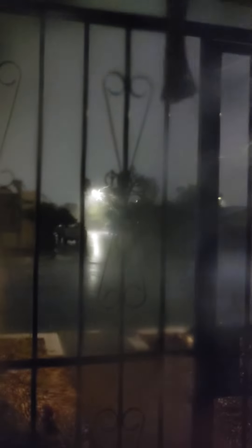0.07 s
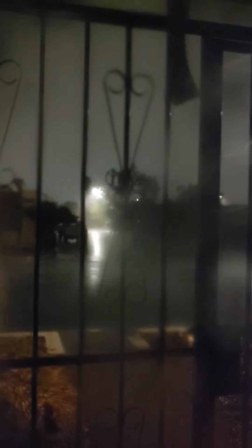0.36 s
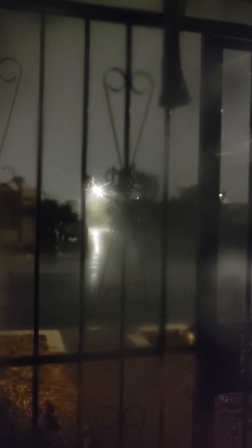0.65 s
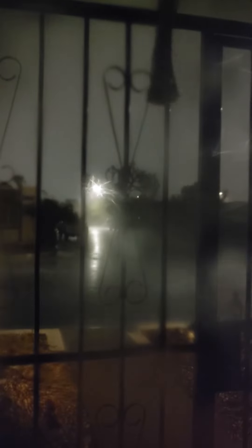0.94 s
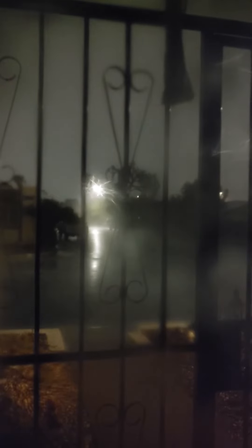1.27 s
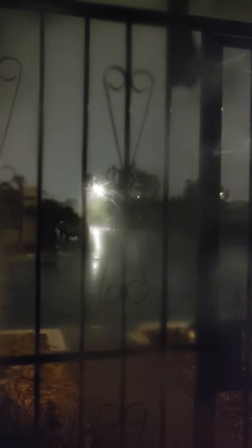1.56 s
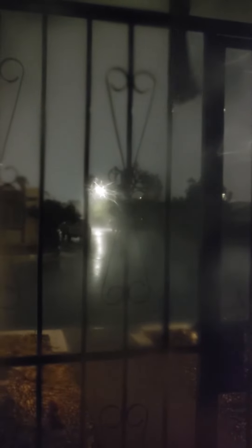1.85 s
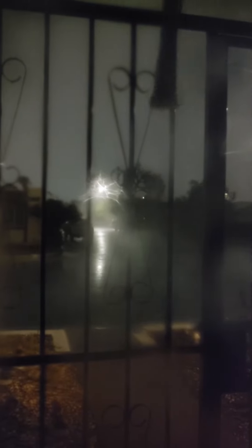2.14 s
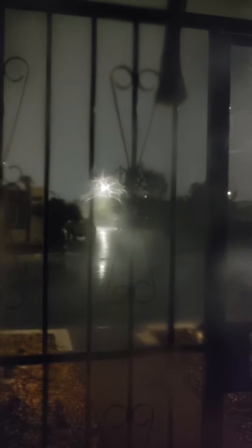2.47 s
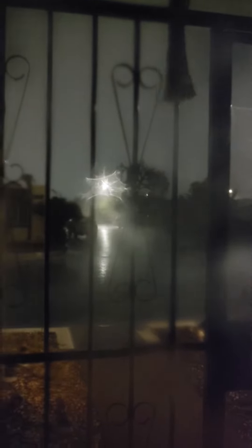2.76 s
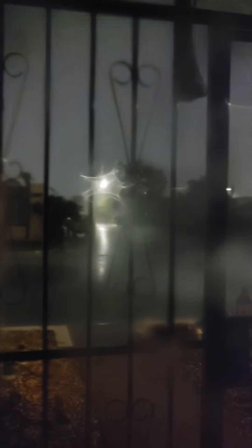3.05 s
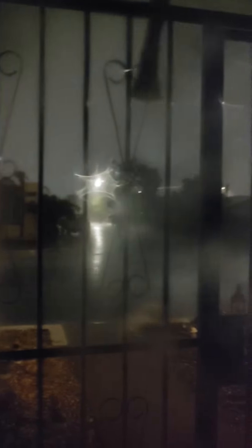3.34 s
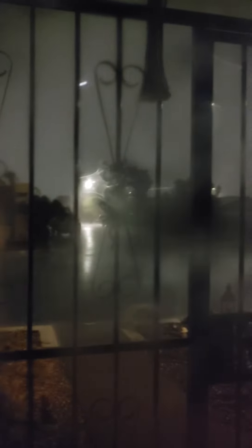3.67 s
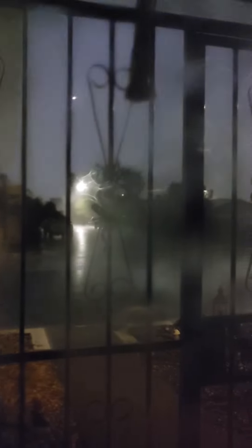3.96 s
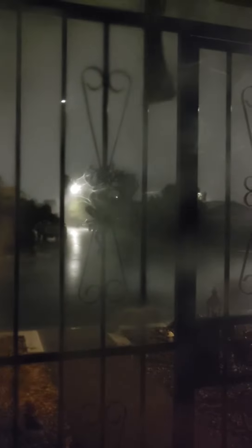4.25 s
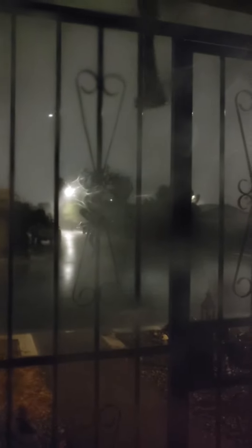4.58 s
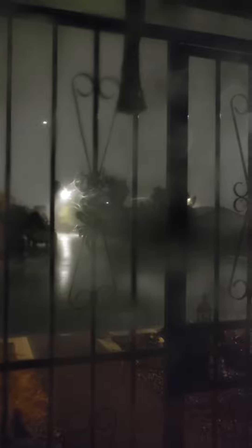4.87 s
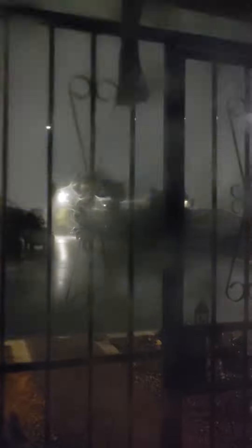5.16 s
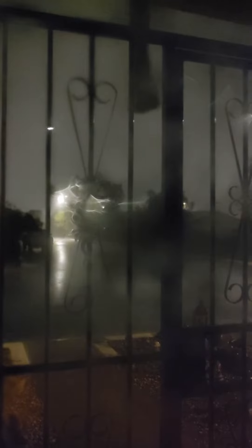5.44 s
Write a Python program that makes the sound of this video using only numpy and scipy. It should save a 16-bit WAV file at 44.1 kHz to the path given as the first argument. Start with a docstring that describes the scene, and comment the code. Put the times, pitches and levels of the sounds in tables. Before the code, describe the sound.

A steady downpour booms on the roof and hisses on the street, with close drips from the eaves and a faint hum.

```python
"""Heavy night rain, heard from just inside a barred window.
From the start the downpour drums on the roof and, with the wind, booms in the room, over street hiss
and a thin whine. Drops from the eaves splat, click and plop close by, mostly to the right; the walls
answer, and a gutter rings now and then. Just after 1 s a mains hum swells and a soft thud passes.
Near 2.7 s one drop gulps and the rain peaks; after 4 s hum and gutter swell again in easing rain."""
import sys
import numpy as np
from scipy import signal
from scipy.fft import rfft, irfft, next_fast_len
from scipy.io import wavfile
from scipy.ndimage import uniform_filter1d, map_coordinates

SR = 44100
rng = np.random.default_rng(int(sys.argv[2]) if len(sys.argv) > 2 else 0)


def transcribe(u):
    """Save the signal u as a 16-bit wav file named by the first command-line argument.

    u: samples, shape (n,) or (channels, n), limited to [-1, 1]; the rate is SR.
    q: integer samples, one column per channel.
    """
    v = np.clip(np.atleast_2d(u).T, -1, 1)
    q = np.round(v * 32767).astype(np.int16)
    wavfile.write(sys.argv[1], SR, q)


N = 247401

# Resonances of roof, roof panels, room, gutter and whine: centre_hz, half_width_hz, gain_db
ROOF_MODES = [(274, 20, -7.5), (285.2, 16.2, -1), (332, 15.4, -1.5), (363.8, 13, -4), (438, 22, -8.5)]
PANEL_MODES = [(519, 52, -6), (581.5, 15.5, -1), (614, 7.8, -0.5), (656, 32, -6.5), (717, 7.9, -10.5),
               (796, 43, -13.5), (1028, 31, -16)]
ROOM_MODES = [(80.6, 3.5, -10.5), (99.3, 10.7, -5), (125, 5.8, 3.5), (134.4, 7.8, -2.5), (146.1, 0.87, 5.5),
              (167, 13, 4), (181.4, 11.6, 1)]
GUTTER_MODES = [(740.4, 16, 16), (810, 56, -16), (1030, 11, -25)]
WHINE_MODES = [(1910, 48, 0), (1780, 100, -4.5)]
# Spectral shapes of the continuous noises: frequency_hz, density_db
ROOF_SPECTRUM = [(110, -28.5), (200, -1), (265, -3.5), (370, -2.5), (490, -12.5), (640, -17.5),
                 (790, -32.5), (890, -26.5), (1100, -37), (1400, -45), (2500, -68)]
WIND_SPECTRUM = [(15, -36), (25, -29), (40, -1), (70, 51), (150, 17), (300, -33), (600, -58)]
STREET_SPECTRUM = [(400, -15), (900, 8), (1250, 5.5), (1600, 6), (1900, 5), (2130, 3), (3300, -1.5),
                   (4700, -6.5), (5800, -1.5), (6700, -10.5), (7700, -14), (11000, -14), (13000, -17),
                   (15700, -17)]
# Spectral shapes of the four parts of a splat: frequency_hz, density_db
TICK_SPECTRUM = [(2000, -70), (3800, -34), (4800, -8), (5700, 7.5), (6600, -2), (7300, -11.5), (9500, -67)]
KNOCK_SPECTRUM = [(600, -80), (1100, -31), (1600, 3.5), (2200, 4), (3000, 0), (4500, -27), (7000, -100)]
TAP_SPECTRUM = [(1200, -90), (2400, -13), (3200, -6.5), (4200, 1.5), (4900, -2.5), (6000, -5), (8000, -67)]
SPRAY_SPECTRUM = [(2000, -80), (5000, -2), (7000, 9.5), (9000, 5), (10500, -1.5), (15500, -11)]
# Strength of the rain all around, and of the sheets blown onto the roof: time_s, gain_db
RAIN_STRENGTH = [(0, -1.5), (1.05, -1), (1.7, 0.4), (2.25, 0.8), (2.75, 2), (3.5, -1), (4.5, -1.1),
                 (5.2, -1), (5.61, -0.5)]
ROOF_SHEETS = [(0, -3.5), (.38, -1.5), (.6, 1.5), (.8, 1), (.93, 4.5), (1.15, -0.5), (1.55, 3), (1.9, 0.5),
               (2.4, 2.5), (2.65, 1), (3.1, 4.5), (3.4, 2.5), (4.0, -0.7), (4.27, -5.5), (4.82, 3.5),
               (5.1, -0.5), (5.61, -3.5)]
# Envelopes of the roof panels, the wind-stirred room and the mains hum: time_s, level_db
PANEL_ENVELOPE = [(0, -51.5), (.8, -49.5), (.91, -46), (1.05, -50), (1.35, -52), (1.72, -45), (2.0, -48.5),
                  (2.3, -48), (2.55, -49), (2.86, -46), (3.1, -47), (3.5, -54), (3.97, -50), (4.1, -56.5),
                  (4.55, -58), (4.8, -59), (5.05, -49.5), (5.24, -48), (5.4, -53), (5.61, -51)]
GUST_ENVELOPE = [(0, -39.5), (.55, -37), (.85, -42.5), (1.22, -36.5), (1.4, -39.5), (1.8, -39.5),
                 (2, -40.5), (2.9, -38), (3.45, -35.5), (3.8, -41), (4.02, -41), (4.15, -39.5),
                 (4.38, -36.5), (4.53, -39), (4.8, -37), (5.3, -40.5), (5.5, -38), (5.61, -40.5)]
HUM_ENVELOPE = [(0, -51), (.95, -53.5), (1.1, -42), (1.25, -40), (1.45, -57), (2.4, -46), (2.7, -50),
                (3.9, -58), (4.17, -39.5), (4.32, -39), (4.42, -60), (5.61, -48)]
# Big drops from the eaves; pan is left minus right throughout:
# start_s, level_db, body_gain_db, spray_gain_db, pitch_hz, pan_db
EAVES_DROPS = [(0.134, -48, -13, -21, 5900, -2), (0.1798, -48, -8, -21, 5710, -6),
               (0.508, -43.5, -9.5, -30, 5500, -6), (0.524, -46.5, -14, -23, 5460, -7),
               (0.628, -56, -3, -30, 5610, -3), (0.697, -47.5, -29, -22, 6200, -2),
               (0.7743, -47.5, -10.5, -19, 5940, -7), (1.082, -41, -18.5, -12.5, 5900, -3),
               (1.13, -44.5, -23, -22, 5830, -7), (1.312, -47.5, 7, -40, 5100, -4.5),
               (1.415, -43, -13, -27, 5330, -4), (1.442, -42, -12, -35, 5230, -6),
               (1.486, -42.5, -2.5, -23, 5700, -2.5), (1.561, -41.5, -13, -40, 5800, -3),
               (1.635, -35.5, -12, -20, 6000, -4), (2.4822, -37, -13, -26, 5800, -4),
               (2.775, -43.5, -10, -32, 5850, -4), (2.951, -44.5, -21, -21.5, 5940, -6),
               (3.0018, -37.5, -21, -33, 6100, -1), (3.048, -43.5, -20, -22, 5470, -10),
               (3.197, -49, -8, -14, 5700, -3), (3.2225, -39.5, -3.5, -13, 5800, -2),
               (3.2857, -38, -13, -21.5, 5900, -4), (3.326, -47, -3.5, -16, 5700, -3),
               (3.409, -45.5, -20, -19, 5630, -3), (3.429, -47.5, -11.5, -24, 5550, -9),
               (3.6767, -46, -6, -17, 5560, -5), (3.714, -45.5, -23, -23, 5550, -5),
               (3.75, -49, -22, -19, 5660, -2), (4.097, -48.5, -8, -19, 5980, -4),
               (4.12, -41, -22, -29, 5980, -1), (4.161, -45, -19, -32, 5360, -9),
               (4.199, -41.5, -33, -32, 5540, -4), (4.304, -49.5, -10, -22, 5590, -6.5),
               (4.345, -43.5, -11, -13, 5700, -3), (4.702, -49, -7.5, -16, 6020, -5),
               (4.772, -57.5, 1.5, -11, 5700, -6), (4.861, -52.5, -12, -14, 6350, -3),
               (4.985, -50, -24, -18, 5600, -7), (5.2882, -46.5, -21, -35, 5630, -6),
               (5.3897, -48.5, -9, -21, 5630, -9), (5.454, -50, -0.5, -20, 5830, -9),
               (5.5154, -49, -15, -6.5, 5710, -3), (5.542, -40, -19, -26, 5660, -7)]
# Drops that strike something hard: start_s, level_db, pitch_hz, pan_db
CLICKS = [(0.182, -46, 4970, -9), (0.53, -43.5, 2200, 0), (1.0835, -40, 5760, -10),
          (1.3126, -36, 3900, -12), (1.4412, -39.5, 4400, -5.5), (1.4474, -41, 5100, -5.5),
          (1.4868, -41, 4400, -3.5), (1.495, -45, 3450, -5), (1.563, -41, 5500, 1),
          (1.6375, -33.5, 5760, -10), (2.6629, -36.5, 1550, -1), (3.0072, -35.5, 5900, -1.5),
          (3.2212, -42, 3200, -4.5), (3.2645, -36, 1990, 1), (3.288, -38.5, 5900, 0),
          (3.9327, -51, 3870, -7), (4.0975, -51, 4130, -11), (4.123, -38.5, 5970, -1.5),
          (4.162, -45, 5600, -6.5), (4.2107, -47, 5250, -1), (4.3473, -38, 5450, -8)]
# Drops that ring in standing water: start_s, level_db, pitch_hz, width_octaves, pan_db
PLOPS = [(0.512, -49.5, 2620, 0.14, -1), (0.514, -51, 1780, 0.11, 5), (0.776, -51, 2580, 0.2, -4),
         (1.317, -47.5, 2230, 0.24, 5), (1.49, -49, 2300, 0.27, 1), (2.665, -52, 1340, 0.59, -15),
         (2.672, -59, 1150, 0.25, -2), (2.684, -52, 1500, .26, -3), (3.2217, -47.5, 3740, 0.4, -13),
         (3.263, -45, 2160, 0.45, -1), (3.92, -53.5, 3640, 0.47, -11.5), (4.706, -56, 1900, 0.31, -6)]
# Surges of water in the gutter: peak_s, half_width_s, rise_db
GUTTER_SURGES = [(0.57, 0.03, 12), (1.143, 0.036, 9), (2.798, 0.093, 7.5), (4.222, 0.046, 13.5),
                 (4.46, 0.12, 7)]
# Faint steady tones: pitch_hz, level_db, pan_db
FAINT_TONES = [(58, -70.5, 4), (3520, -101, 0), (4390, -87.5, 9), (5614, -87, -3)]
# Likeness of the left and right channels: frequency_hz, coherence_ratio
STEREO_COHERENCE = [(30, .88), (80, .96), (200, .94), (350, .87), (480, .48), (600, .58), (750, .62),
                    (950, .1), (1400, .4), (2400, .14), (4400, .22), (8000, .08)]
# Phase by which the left channel leads: frequency_hz, lead_rad
STEREO_LEAD = [(190, 0), (260, .32), (450, .25), (610, 1.2), (750, .45), (1200, 2.7), (1700, 3.2),
               (3000, 4), (4400, 7.4), (5800, 10), (10000, 18)]
# Level difference between the channels: frequency_hz, pan_db
STEREO_BALANCE = [(60, -0.5), (130, -1), (190, 0.5), (280, 5), (390, 0.5), (450, -6), (520, 3.5), (600, -6),
                  (690, 5.5), (790, -7), (900, 4), (1030, -5.5), (1300, -3.5), (2200, 1), (3000, 0),
                  (4300, -5.5), (11000, 0)]

ROOF_DB, GUTTER_DB, STREET_DB, WHINE_RING_DB = -42, -58, -58.5, -71  # base gains in average rain
ATTACK_S, LOUD_DROP_DB, SOFTEN_DB = 0.0021, -35, 33  # a splat SOFTEN_DB weaker rises e times slower
TICK_HZ = 5880  # pitch at which the tick's spectrum is unshifted
HUM_HZ, WHINE_HZ, BAND_LIMIT_HZ = 120, 1898.6, 15735


def roof():
    """Impact excitation: sheets of rain drum on the roof; harder drops ring its panels' higher modes."""
    drumming = rush(lambda hz: amp(along(ROOF_SPECTRUM, hz)), patchy_db=3.0)
    body = rush(lambda hz: resonances(ROOF_MODES, hz), patchy_db=1.8)
    panels = rush(lambda hz: resonances(PANEL_MODES, hz), patchy_db=2.5)
    sheets = amp(ROOF_DB + envelope(ROOF_SHEETS))
    return sheets * (drumming + amp(-1.0) * body) + amp(envelope(PANEL_ENVELOPE)) * panels


def room_boom():
    """Room resonance: wind and downpour stir the low modes, over a weak rumble of wind."""
    room = rush(lambda hz: resonances(ROOM_MODES, hz), patchy_db=-1.0)
    wind = rush(lambda hz: amp(along(WIND_SPECTRUM, hz)), patchy_db=-4.0)
    return amp(envelope(GUST_ENVELOPE)) * room + amp(-64.5) * wind


def eaves():
    """Impact transients: big drops land close to the window, the weaker ones with a slower rise."""
    out = np.zeros((2, N))
    for start_s, level_db, body_db, spray_db, pitch_hz, pan_db in EAVES_DROPS:
        attack_s = ATTACK_S * np.exp((LOUD_DROP_DB - level_db) / SOFTEN_DB)
        add(out, start_s, amp(level_db) * panned(pan_db) * splat(body_db, spray_db, attack_s, pitch_hz))
    return out


def splat(body_db, spray_db, attack_s, pitch_hz):
    """Superposition: a bursting drop sums a bright tick, the surface's knock and tap, and fine spray."""
    tick = [(hz * pitch_hz / TICK_HZ, db) for hz, db in TICK_SPECTRUM]
    parts = [(tick, 3.6), (KNOCK_SPECTRUM, body_db + 3), (TAP_SPECTRUM, body_db + 11.5),
             (SPRAY_SPECTRUM, spray_db + 12.5)]
    impact = sum(amp(db) * burst(lambda hz: amp(along(shape, hz)), t60_s=0.042, attack_s=attack_s)
                 for shape, db in parts)
    return walls(impact, t60_s=0.19, direct_db=-12.5)


def clicks():
    """Brief contact: drops on a hard edge give sharp clicks, with little reflection from the walls."""
    out = np.zeros((2, N))
    for start_s, level_db, pitch_hz, pan_db in CLICKS:
        click = burst(band(pitch_hz, octaves=0.23), t60_s=0.016, attack_s=0.001)
        add(out, start_s, amp(level_db) * panned(pan_db) * walls(click, t60_s=0.15, direct_db=5))
    return out


def plops(note_db=-8, note_t60_s=0.024):
    """Bubble resonance: air trapped by a drop in standing water rings briefly amid the splash."""
    out, t = np.zeros((2, N)), np.arange(SR // 16) / SR
    for start_s, level_db, pitch_hz, octaves, pan_db in PLOPS:
        splash = burst(band(pitch_hz, octaves), t60_s=0.071, attack_s=0.0016)
        note = amp(note_db - 60 * t / note_t60_s) * np.sin(2 * np.pi * pitch_hz * t)
        plop = walls(splash + note, t60_s=0.2, direct_db=-3)
        add(out, start_s, amp(level_db + 5.5) * panned(pan_db) * plop)
    return out


def gulp(start_s=2.662, level_db=-45, start_hz=1880, fall_hz_per_s=17000, t60_s=0.12, attack_s=0.00071):
    """Damped oscillation: one drop lands with a hollow note whose pitch falls quickly."""
    out, t = np.zeros((2, N)), np.arange(SR // 23) / SR
    phase = 2 * np.pi * np.cumsum(start_hz - fall_hz_per_s * t) / SR
    note = np.sin(phase) * amp(level_db - 60 * t / t60_s) * (1 - np.exp(-t / attack_s))
    add(out, start_s, panned(15) * walls(note, t60_s=0.14, direct_db=-4))
    return out


def patter(rain_db, count=190):
    """Random arrivals: small, farther drops tick, mostly as reverberation; they fade as rain eases."""
    out = np.zeros((2, N))
    for when, size, lowness in rng.uniform(0, 1, (count, 3)):
        pitch_hz = 6000 * 2 ** (-0.5 * lowness ** 5)  # most are high, a few lower
        tick = burst(band(pitch_hz, octaves=0.19), t60_s=0.044, attack_s=0.00068)
        drop = walls(tick, t60_s=0.23, direct_db=-21)
        add(out, when * N / SR, amp(-56.0 + 2.16 * size) * panned(-3.5) * drop)
    return amp(rain_db) * out


def thud(peak_s=1.272, pitch_hz=128, level_db=-29.0, half_width_s=0.029):
    """A Gaussian tone pulse: one soft, low bump swells out of the rumble."""
    t = np.arange(N) / SR - peak_s
    return amp(level_db) * np.exp(-(t / half_width_s) ** 2) * np.sin(2 * np.pi * pitch_hz * t)


def gutter(rain_db, rain_exponent=1.4, pitch_waver=0.009):
    """Forced resonance: running water sounds a gutter's narrow modes, which waver and surge."""
    t = np.arange(N) / SR
    surge_db = sum(rise_db * np.exp(-((t - peak_s) / half_width_s) ** 2)
                   for peak_s, half_width_s, rise_db in GUTTER_SURGES)
    level_db = GUTTER_DB + rain_exponent * rain_db + surge_db + 1.8 * wobble(11)
    position = np.cumsum(1 + pitch_waver * wobble(12))  # an uneven reading speed bends the pitch
    ring = rush(lambda hz: resonances(GUTTER_MODES, hz), patchy_db=0.0)
    return amp(level_db) * np.array([map_coordinates(side, [position], mode="reflect") for side in ring])


def street(rain_db):
    """Incoherent summation: far impacts on the wet street merge into a hiss."""
    level_db = STREET_DB + rain_db + 0.25 * wobble(6.4)
    return amp(level_db) * rush(lambda hz: amp(along(STREET_SPECTRUM, hz)), patchy_db=1.75)


def hum_and_tones(drift_hz=0.76):
    """A line spectrum: a swelling mains hum, a thin whine and faint tones, all slightly unsteady."""
    out = np.zeros((2, N))
    lines = FAINT_TONES + [(HUM_HZ, envelope(HUM_ENVELOPE), -0.5), (WHINE_HZ, -78.5, -9)]
    for pitch_hz, level_db, pan_db in lines:
        amplitude = np.sqrt(2) * amp(level_db + 0.62 * wobble(3.26))
        phase = 2 * np.pi * np.cumsum(pitch_hz + drift_hz * wobble(4.87)) / SR
        out += amplitude * panned(pan_db) * np.sin(phase)
    return out


def whine_ring(rain_db):
    """Random excitation: rain keeps a thin resonance ringing around the whine, at a wavering level."""
    ring = rush(lambda hz: resonances(WHINE_MODES, hz), patchy_db=1.0)
    return amp(WHINE_RING_DB + rain_db + 2.8 * wobble(12)) * panned(-5.0) * ring


def walls(sound, t60_s, direct_db):
    """Reverberation: the window recess adds a dense tail; direct_db is the direct-to-tail ratio."""
    t = np.arange(SR // 4) / SR
    response = rng.standard_normal((2, len(t))) * amp(-60 * t / t60_s)
    response /= np.linalg.norm(response[0])
    response[:, 0] += amp(direct_db)
    response /= np.linalg.norm(response[0])
    return signal.fftconvolve(sound[None], response, axes=1)


def burst(colour, t60_s, attack_s):
    """Exponential decay: water breaking up on impact gives a brief puff of coloured noise."""
    t = np.arange(SR // 16) / SR
    noise = unit(filtered(rng.standard_normal(len(t)), colour))
    return noise * amp(-1.0 - 60 * t / t60_s) * (1 - np.exp(-t / attack_s))


def rush(colour, patchy_db):
    """Partial coherence: countless drops merge into stereo noise of rms 1, partly alike on both sides."""
    spectra = signal.stft(rng.standard_normal((2, N)), nperseg=512)[2]
    patches = uniform_filter1d(rng.standard_normal(spectra.shape[1:]), size=9, axis=0)
    patches = uniform_filter1d(patches, size=10, axis=1)  # random gain, smooth in frequency and time
    pair = signal.istft(spectra * amp(patchy_db * unit(patches)), nperseg=512)[1][:, :N]
    angle = lambda hz: np.arccos(np.clip(along(STEREO_COHERENCE, hz), -1, 1)) / 2
    mid, side = filtered(pair, lambda hz: colour(hz) * [np.cos(angle(hz)), np.sin(angle(hz))])
    half = np.array([[0.5], [-0.5]])
    balance = lambda hz: amp(half * along(STEREO_BALANCE, hz))
    lead = lambda hz: np.exp(1j * half * along(STEREO_LEAD, hz))
    return unit(filtered(np.array([mid + side, mid - side]), lambda hz: balance(hz) * lead(hz)))


def resonances(modes, hz):
    """Power summation: the joint gain of independent modes with steep skirts."""
    gains = (amp(db) / (1 + ((hz - centre) / width) ** 2) for centre, width, db in modes)
    return np.sqrt(sum(gain ** 2 for gain in gains))


def band(centre_hz, octaves):
    """A band-pass response, Gaussian in log frequency."""
    return lambda hz: np.exp(-0.5 * (np.log2((hz + 1) / centre_hz) / octaves) ** 2)


def filtered(x, response):
    """Linear filtering: the spectrum of x is multiplied by a frequency response."""
    length = x.shape[-1]
    padded = next_fast_len(length + 4096)
    return irfft(rfft(x, padded) * response(np.fft.rfftfreq(padded, 1 / SR)), padded)[..., :length]


def along(points, hz):
    """Interpolation of (frequency_hz, value) points on a log axis."""
    frequencies, values = np.transpose(points)
    return np.interp(np.log(hz + 1), np.log(frequencies + 1), values)


def envelope(points):
    """Linear interpolation of (time_s, value) points at every sample."""
    return np.interp(np.arange(N) / SR, *np.transpose(points))


def wobble(rate_hz):
    """Random modulation: a smooth curve with rate_hz knots a second."""
    knots = rng.standard_normal(int(N * rate_hz / SR) + 4)
    return map_coordinates(knots, [np.arange(N) * rate_hz / SR])


def panned(pan_db):
    """Left and right gains for a level difference."""
    return amp([[pan_db / 2], [-pan_db / 2]])


def amp(db):
    """Decibels to amplitude ratio."""
    return 10 ** (np.asarray(db) / 20)


def unit(x):
    """Normalisation to rms 1."""
    return x / np.sqrt(np.mean(x ** 2) + 1e-20)


def add(track, start_s, sound):
    """Superposition of a sound on the track from start_s."""
    part = track[:, max(round(start_s * SR), 0):][:, :sound.shape[-1]]
    part += sound[..., :part.shape[1]]


def scene():
    """Superposition: near drops lie on a continuous bed of rain, wind and hum."""
    rain_db = envelope(RAIN_STRENGTH)
    bed = room_boom() + roof() + gutter(rain_db) + whine_ring(rain_db) + street(rain_db)
    return bed + thud() + hum_and_tones() + eaves() + clicks() + plops() + gulp() + patter(rain_db)


def record(dry):
    """Band limiting: an ideal low-pass filter removes the highest treble."""
    return filtered(dry, lambda hz: hz < BAND_LIMIT_HZ)


dry = scene()
out = record(dry)
transcribe(out)
```